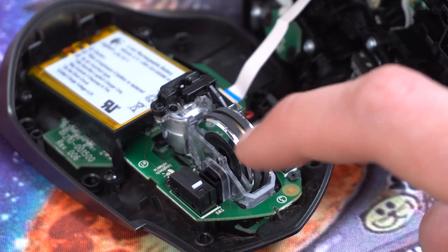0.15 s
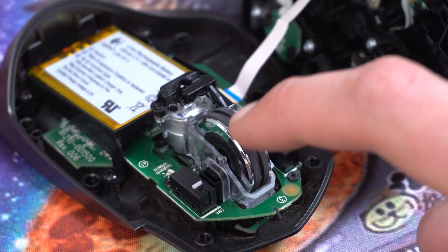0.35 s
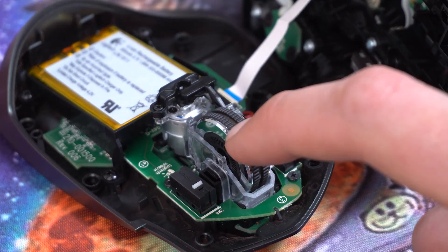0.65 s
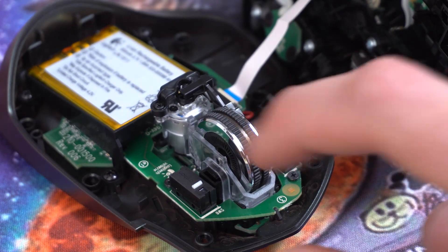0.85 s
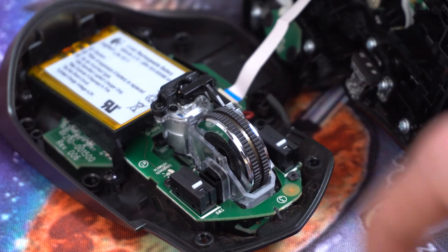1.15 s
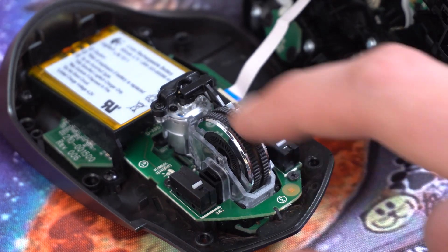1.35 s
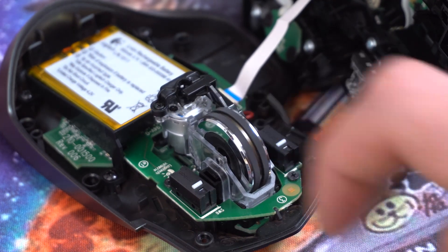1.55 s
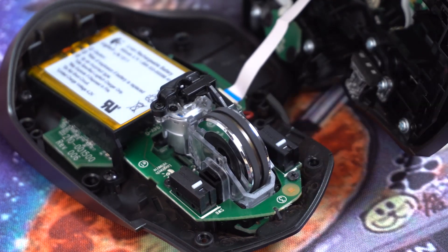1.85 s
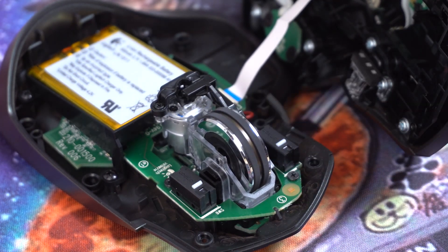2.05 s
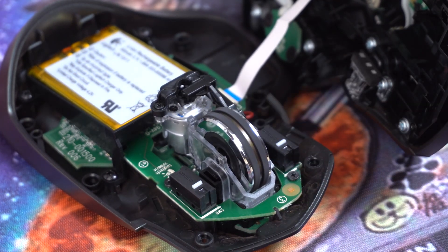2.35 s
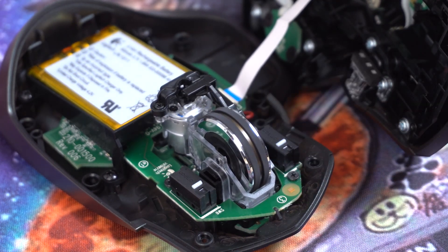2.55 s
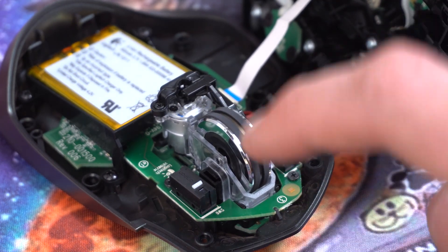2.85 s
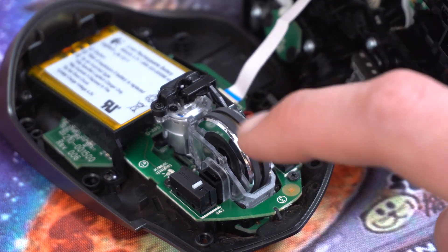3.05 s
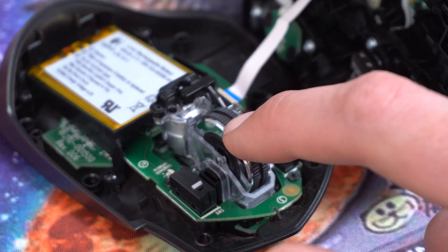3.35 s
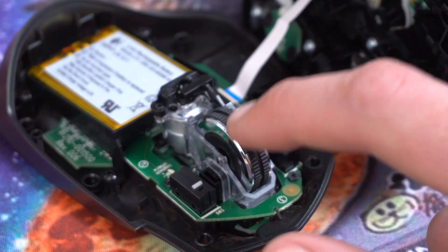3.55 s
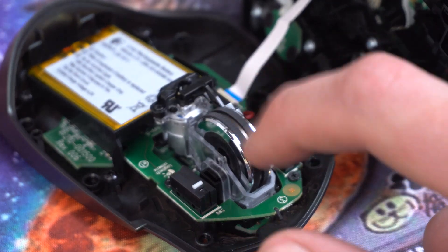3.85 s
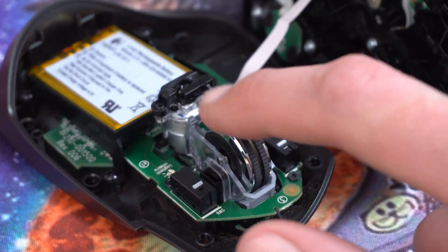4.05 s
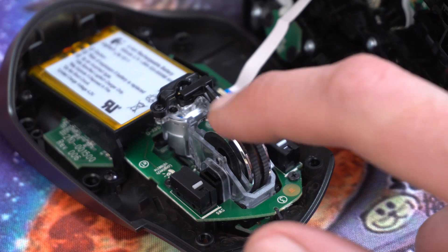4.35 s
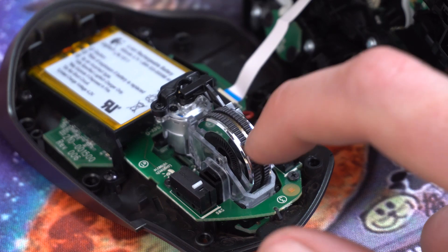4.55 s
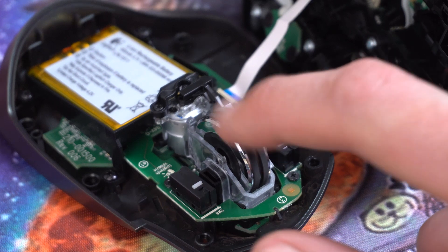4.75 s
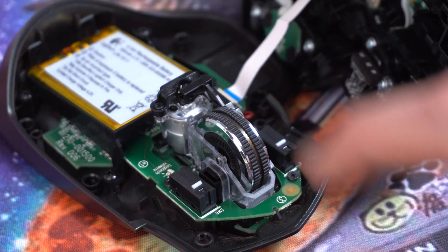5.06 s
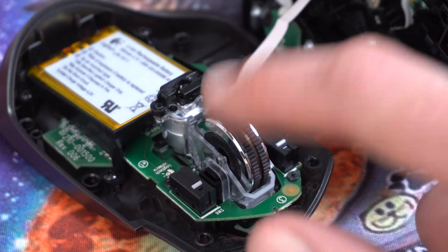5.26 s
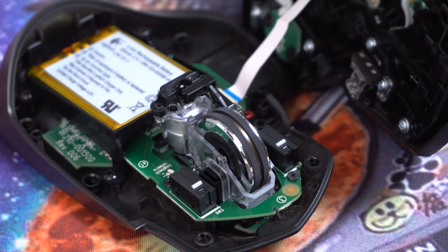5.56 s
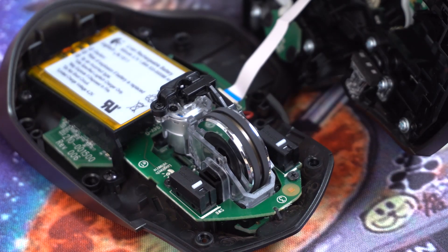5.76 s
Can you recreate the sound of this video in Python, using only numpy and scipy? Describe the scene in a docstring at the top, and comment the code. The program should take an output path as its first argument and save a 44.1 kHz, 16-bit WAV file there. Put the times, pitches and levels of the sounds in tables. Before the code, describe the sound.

Close, irregular ticking of a metal scroll wheel worked by a finger, with crisp latch snaps, dull knocks and a faint low hum.

```python
"""The metal scroll wheel of an opened mouse, worked by a finger on a desk mat, close and nearly mono.
Rolling or flicking drags a sprung pawl over the teeth; pressing snaps the latch; the shell rocks.
A few dull knocks come from further off in the small room, over mains hum and a fan."""
import sys
import numpy as np
from scipy import signal
from scipy.fft import rfft, irfft
from scipy.io import wavfile
from scipy.ndimage import uniform_filter1d

SR = 44100
rng = np.random.default_rng(int(sys.argv[2]) if len(sys.argv) > 2 else 0)


def log_audio(samples):
    """Write samples as a 16-bit WAV file to the path given in sys.argv[1]."""
    # one column per channel
    frames = np.atleast_2d(samples).T
    # limit to full scale, then quantise
    limited = np.clip(frames, -1, 1)
    pcm = np.round(limited * 32767).astype(np.int16)
    wavfile.write(sys.argv[1], SR, pcm)


N = 261072

# Table levels are relative; each source adds its own gain.
# finger rolls: (time [s], teeth, first gap [s], middle gap [s], last gap [s], level [dB],
# change over the roll [dB], treble [dB], shell push [dB])
ROLLS = [(3.8619, 5, 0.026, .017, 0.017, -25.5, 1.5, -12, -34),
         (4.184, 4, .0165, .0194, .0176, -25, -1, -9.5, -35),
         (4.483, 4, .0189, .019, .0198, -25.5, 0.5, -13, -34),
         (4.856, 6, .0139, 0.0093, .019, -22, -2, -13, -31.5)]
# slips on release: (time [s], first gap [s], level [dB], treble [dB], shell push [dB])
SLIPS = [(0.9153, 0.016, -30, -9.5, -39), (3.9795, .0146, -32, -9, -37), (4.264, 0.015, -27.5, -12, -38.5),
         (4.5821, .0138, -31.5, -12.5, -39.5), (4.9643, 0.017, -28, -14.5, -34.5)]
# flicks: (time [s], start speed [teeth/s], peak [dB], slope past peak [dB/tooth], shell push [dB])
FLICKS = [(1.574, 88.6, -12.5, -7, -31.5), (5.3819, 101, -12, -5.5, -29)]
# dense, fast-dying modes of wheel and cradle: (frequency [Hz], level [dB])
WHEEL_CRACK = [(300, -8), (1000, -11), (1500, 1.5), (2800, 4), (4600, -2), (6500, -2), (8300, -5),
               (9400, -4.5), (11500, -9), (16000, -8.5)]


def undb(db):
    """Decibels to gain."""
    return 10 ** (np.asarray(db) / 20)


def unit(x):
    """Scale to unit energy."""
    return x / np.sqrt(np.sum(x ** 2))


def colour(x, points):
    """Filter by (frequency [Hz], gain [dB]) points."""
    hz, db = np.transpose(points)
    bins_hz = np.maximum(np.fft.rfftfreq(len(x), 1 / SR), 1)
    return irfft(rfft(x) * undb(np.interp(np.log(bins_hz), np.log(hz), db)), len(x))


def noise(points):
    """Coloured noise, unit rms."""
    x = colour(rng.standard_normal(N), points)
    return x / x.std()


def walk(rate_hz):
    """Smooth random wander, spread near one."""
    hold = int(SR / rate_hz)
    return uniform_filter1d(np.repeat(rng.standard_normal(N // hold + 1), hold), hold)[:N]


def highpass(x, hz):
    """Fourth-order high-pass."""
    return signal.sosfilt(signal.butter(4, hz, "high", fs=SR, output="sos"), x)


def add(track, s, sound):
    """Mix a sound in at time s."""
    start = max(int(s * SR), 0)
    track[start:start + len(sound)] += sound[:max(N - start, 0)]


def ring(modes, t, scatter_db, detune):
    """Decaying modes; pitch, polarity and energy share scatter per blow."""
    hz, db, t60_s = np.transpose(modes)[:, :, None]
    shift, share, polarity = rng.standard_normal((3, len(modes), 1))
    amplitude = np.sign(polarity) * undb(db + scatter_db * share) / np.sqrt(t60_s)
    tones = np.sin(2 * np.pi * hz * (1 + detune * shift) * t)
    return unit(np.sum(amplitude * tones * np.exp(-np.log(1000) * t / t60_s), axis=0))


def strikes(events, modes, crack_spectrum, treble_ref_db, scrape_db, scrape_s, chatter_s,
            crack_db, crack_s, detune, low_hz):
    """Scrape, blow and chatter ring the modes, plus a dense-mode crack. Returns (direct, room send)."""
    direct, send, lead = np.zeros(N), np.zeros(N), SR // 100
    t = np.arange(SR // 10) / SR
    scrape = undb(scrape_db) * np.exp(-t[lead:0:-1] / scrape_s)
    force_envelope = np.concatenate([scrape, np.exp(-t[:-lead] / chatter_s)])
    crack_envelope = np.concatenate([scrape, np.exp(-t[:-lead] / crack_s)])
    for s, db, treble_db in events:
        force = force_envelope * rng.standard_normal(len(t))
        force[lead] += 3.5  # the blow
        body = unit(signal.fftconvolve(force, ring(modes, t, scatter_db=0, detune=detune))[:len(t)])
        body = highpass(body, low_hz)  # small parts radiate little bass
        crack = unit(crack_envelope * colour(rng.standard_normal(len(t)), crack_spectrum))
        # the room hears all sides, where dense modes weigh more
        for track, dense_db in (direct, crack_db), (send, crack_db + 12.5):
            click = colour(body + undb(dense_db) * crack, [(3500, 0), (6000, treble_db - treble_ref_db)])
            add(track, s + .0007 - lead / SR, undb(db) * unit(click))
    return np.array([direct, send])


def air(swell_db):
    """Ventilation rush and hiss over building rumble."""
    # room air and microphone hiss: (frequency [Hz], density [dB])
    spectrum = [(53, -36), (90, -8), (187, -4), (213, -8.5), (276, -4.5), (307, -9), (365, -9.5),
                (389, -17.5), (453, -9.5), (586, -16), (1270, -21.5), (1360, -23.5), (3010, -22.5),
                (4840, -30), (15500, -33)]
    rush = undb(-55.16 + 0.5 * walk(3.17)) * noise(spectrum)
    rumble_gain = undb(-57 + swell_db + 0.5 * walk(4.9))
    return rush + rumble_gain * noise([(15, -38), (28, -8), (40, 0), (80, -4), (130, -14), (400, -81)])


def hum(swell_db):
    """Swelling mains hum under wavering fan tones."""
    # mains, then fan: (frequency [Hz], level [dB])
    tones = [(59.2, -53.5), (279.9, -61), (452.2, -71.5)]
    (mains_hz, mains_db), *fan = tones
    t = np.arange(N) / SR
    out = undb(mains_db + swell_db + 0.5 * walk(3.16)) * np.sin(2 * np.pi * mains_hz * t)
    for hz, db in fan:
        out += undb(db - 3 + 4.5 * walk(11)) * np.sin(2 * np.pi * hz * t + 0.82 * walk(12))
    return np.sqrt(2) * out


def room(x, wet_db, build_s, echo_db, echo_s):
    """One near reflection and a diffuse tail that builds up, then decays per band."""
    # tail bands: (frequency [Hz], level [dB], t60 [s])
    bands = [(100, -7, 0.13), (507, 19, 0.2), (1390, 3, 0.38), (2900, 2.5, 0.63), (6940, 4, 0.45),
             (11200, 0.5, 0.47), (16000, -8, 0.41)]
    hz, db, t60_s = np.transpose(bands)
    t = np.arange(SR * 3 // 4) / SR
    bins_hz = np.maximum(np.fft.rfftfreq(len(t), 1 / SR), 1)
    wash, tail = rfft(rng.standard_normal(len(t))), 0
    for band, gain, decay_s in zip(np.eye(len(hz)), undb(db), t60_s):
        band_noise = irfft(wash * np.interp(np.log(bins_hz), np.log(hz), band), len(t))
        tail += gain * band_noise * np.exp(-np.log(1000) * t / decay_s)
    response = undb(wet_db) * unit(tail * (1 - np.exp(-t / build_s)))
    response[int(echo_s * SR)] += undb(echo_db)
    return signal.fftconvolve(x, response)[:N]


def knocks():
    """Dull knocks on furniture: a boxy ring and a short clatter."""
    # knocks: (time [s], level [dB], bass [dB], boxiness [dB], treble [dB])
    hits = [(2.162, -24, -6.5, -18, -17.5), (2.173, -30, -11.5, -27, -19.5), (4.985, -40, -27, -10, -28),
            (5.886, -25, -16, -9.5, -13)]
    # furniture modes: (frequency [Hz], level [dB], t60 [s])
    modes = [(110, 0, 0.12), (160, -8, 0.084), (248, 6.5, 0.032), (313, 7, 0.027), (431, -3, 0.046),
             (800, -3.5, 0.015), (1140, -4.5, 0.016), (1490, -2.5, 0.036)]
    # dense modes: (frequency [Hz], level [dB])
    clatter_spectrum = [(60, -5), (200, 10), (900, -9.5), (3500, -2), (7000, -12), (15000, -30)]
    track, t = np.zeros(N), np.arange(SR // 5) / SR
    for s, db, bass_db, box_db, treble_db in hits:
        clatter = unit(colour(rng.standard_normal(len(t)), clatter_spectrum) * np.exp(-t / 0.009))
        knock = ring(modes, t, scatter_db=2, detune=0.024) + undb(-2.5) * clatter
        eq = [(180, bass_db + 9.5), (400, box_db + 7.5), (800, .076), (1500, 1), (3500, treble_db + 13.5)]
        add(track, s - 1 / 20, undb(db + 15.5) * unit(colour(np.pad(knock, SR // 20), eq)))
    return track


def thumps():
    """Low thumps: finger pushes, the latch's thud, and the bass of the distant knock at 2.176 s."""
    # single thumps: (time [s], level [dB])
    singles = [(.762, -34), (1.041, -39), (2.176, -37), (2.923, -31.5), (2.939, -32.5), (2.988, -35),
               (3.44, -41)]
    # (moves, delay [s], gain [dB]); last: the drop back after a flick
    moves = (ROLLS, .0252, 0), (SLIPS, .036, 0), (FLICKS, -.00944, 0), (FLICKS, .06, -3)
    return singles + [(s + lag_s, db + gain_db) for rows, lag_s, gain_db in moves for s, *_, db in rows]


def shell():
    """Low thumps ring the modes of the shell on its mat; each tooth jogs it."""
    # shell on mat: (frequency [Hz], level [dB], t60 [s])
    modes = [(40.8, 4, 0.45), (60, 0.5, 0.082), (104.9, -3, 0.33), (166.7, -8.5, 0.18), (236, -16, 0.031),
             (320, -10.5, 0.037)]
    track, t = np.zeros(N), np.arange(SR // 4) / SR
    for s, db in thumps():
        thump = ring(modes, t, scatter_db=0, detune=0.056) * (1 - np.exp(-t / 0.0012))
        add(track, s, undb(db + 24) * unit(thump))
    for s, db, _ in tooth_drops():
        jog = highpass(ring(modes, t, scatter_db=-2.5, detune=0.017), 87)
        add(track, s, undb(db) * unit(jog))
    return track


def cradle():
    """The wheel's cradle pings as the landing finger takes up its slack."""
    # touches: (time [s], level [dB], treble [dB])
    touches = [(0.6968, -30.5, -14), (1.5692, -30, -5), (3.3847, -25.5, -7), (4.4368, -37.5, -5),
               (4.851, -26.5, -13), (5.3765, -22.5, -6)]
    # cradle modes: (frequency [Hz], level [dB], t60 [s])
    modes = [(3045, 5, 0.032), (3600, -0.5, 0.04), (5760, -12, 0.012)]
    return undb(7) * strikes(
        touches, modes, WHEEL_CRACK, treble_ref_db=-10, scrape_db=-22, scrape_s=.001,
        chatter_s=.0017, crack_db=-21, crack_s=.0017, detune=.0037, low_hz=1000)


def latch():
    """The sprung latch snaps against its plastic carrier, rebounds, then releases."""
    # snaps: (time [s], level [dB], treble [dB], low cut [Hz])
    snaps = [(0.7603, -13, -6, 1910), (3.4875, -7.5, -9.5, 1050)]
    # spring rebounds and release: (delay [s], level [dB], treble [dB])
    rebounds = [(.004, -16.5, -11), (.011, -17.5, -11), (.016, -18.5, -12), (.0838, -22.5, -15)]
    # latch modes: (frequency [Hz], level [dB], t60 [s])
    modes = [(1536, 1.5, 0.0081), (1980, -6, 0.009), (2454, 7.5, 0.022), (2590, 5.5, .022),
             (2920, 5, 0.006), (3170, 3, 0.011), (3720, -6, 0.016), (5000, -9, 0.035), (5670, -6.5, 0.054),
             (6360, -4.5, 0.012), (6680, -11, 0.018), (7770, -11, 0.028), (8440, -0.5, 0.005),
             (8780, -4, 0.014), (11160, -3.5, 0.005), (12700, -21, 0.0072)]
    # dense modes: (frequency [Hz], level [dB])
    crack = [(300, -7), (1000, -11), (1550, 4.5), (2800, 16.5), (4200, 6), (9000, 0.5), (12000, 0),
             (13000, -10), (16000, -11)]
    out = 0
    for s, db, treble_db, low_hz in snaps:
        out += strikes([(s, db, treble_db)], modes, crack, treble_ref_db=-15, scrape_db=-16,
                       scrape_s=.0032, chatter_s=.00097, crack_db=-5, crack_s=.0017,
                       detune=.008, low_hz=low_hz)
        bounces = [(s + delay_s, *strength) for delay_s, *strength in rebounds]
        out += strikes(bounces, modes, crack, treble_ref_db=-16, scrape_db=-13, scrape_s=.0027,
                       chatter_s=.0025, crack_db=-6.5, crack_s=.0028, detune=.015, low_hz=1400)
    return undb(12) * out


def spin(delay_s=.024):
    """Flicked free of the pawl, the metal wheel rings on."""
    # free wheel: (frequency [Hz], level [dB], t60 [s])
    modes = [(2690, -5, .22), (5870, -7, .12), (6050, -2, 0.2), (6266, -1, .3), (9900, -14, .22)]
    track, t = np.zeros(N), np.arange(SR // 3) / SR
    for s, _, peak_db, *_ in FLICKS:
        add(track, s + delay_s, undb(peak_db - 4) * ring(modes, t, scatter_db=3, detune=0.0019))
    return track


def rolled():
    """Under the finger, teeth pass at a smoothly changing pace."""
    for s, teeth, first_s, middle_s, last_s, db, fade_db, treble_db, _ in ROLLS:
        gaps_s = np.interp(np.linspace(0, 2, round(teeth) - 1), np.arange(3), [first_s, middle_s, last_s])
        for delay_s in np.cumsum(np.append(0, gaps_s)):
            yield s + delay_s, db + fade_db * delay_s / gaps_s.sum(), treble_db


def slipped(teeth=3, gap_ratio=0.89, fade_db=-2.5, dull_db=-1.5):
    """Let go, the wheel slips on, each tooth sooner, softer and duller."""
    for s, gap_s, db, treble_db, _ in SLIPS:
        for k in range(teeth):
            yield s, db + k * fade_db, treble_db + k * dull_db
            s += gap_s * gap_ratio ** k


def flicked(teeth=6, accel_per_s2=5000, peak_tooth=3.08, rise_db=3, treble_db_per_db=1.63):
    """The wheel accelerates evenly; teeth swell and brighten, then fade; the pawl is thrown clear."""
    for s, teeth_per_s, peak_db, fade_db, _ in FLICKS:
        for k in range(teeth):
            delay_s = (np.sqrt(teeth_per_s ** 2 + 2 * accel_per_s2 * k) - teeth_per_s) / accel_per_s2
            force_db = (k - peak_tooth) * (rise_db if k < peak_tooth else fade_db)
            yield s + delay_s, peak_db + force_db, -3 + treble_db_per_db * force_db
        yield s + .043, peak_db - 8.5, -14  # the pawl's dull clack


def tooth_drops():
    """All pawl drops: (time [s], level [dB], treble [dB])."""
    # single-tooth nudges: (time [s], level [dB], treble [dB])
    nudges = [(0.9753, -39.5, -19), (1.0125, -40, -25), (3.609, -33.5, -7), (3.8744, -44, -8),
              (4.8334, -45, -1), (5.3656, -37, -4)]
    return np.array([*rolled(), *slipped(), *flicked(), *nudges])


def ratchet():
    """The pawl ticks over each tooth tip, then falls into the gap and rings the wheel."""
    # wheel modes: (frequency [Hz], level [dB], t60 [s])
    modes = [(1574, -1, 0.019), (2130, -10, 0.027), (2500, 1.5, 0.026), (2667, 0, 0.054),
             (2980, -1.5, 0.024), (3670, -7, 0.086), (5560, -5, 0.026), (6160, 0.5, 0.0099),
             (6525, 2.5, 0.018), (6650, -5.5, 0.0055), (7960, -5, 0.017), (8670, -11, 0.0098),
             (10000, -14.5, 0.014), (10900, -3, 0.0041), (12500, -8, 0.0035), (13800, -13, 0.005)]
    drops = tooth_drops()
    tips = drops + (-.005, -13, 8)  # earlier, softer, brighter
    tick = strikes(tips, modes, WHEEL_CRACK, treble_ref_db=-9.5, scrape_db=-13, scrape_s=.0011,
                   chatter_s=.0021, crack_db=-9, crack_s=.0034, detune=.012, low_hz=2400)
    fall = strikes(drops, modes, WHEEL_CRACK, treble_ref_db=-10, scrape_db=-18.5, scrape_s=.0018,
                   chatter_s=.0009, crack_db=-7.5, crack_s=.0044, detune=.012, low_hz=1250)
    return undb(9.5) * (tick + fall)


def scene():
    """Mouse close and fairly dry, knocks far and wet; only faint noise differs between channels."""
    # swell of hum and rumble: (time [s], level [dB])
    swell = [(0.0, -59.5), (1.0, -51), (1.61, -52), (1.99, -58.5), (3.04, -51), (3.47, -49.5), (3.68, -57),
             (4.9, -49.5), (5.9, -56.5)]
    swell_db = np.interp(np.arange(N) / SR, *np.transpose(swell))
    swell_db -= swell_db.mean()
    mouse, send = ratchet() + spin() + latch() + cradle()
    near = mouse + room(send, wet_db=-13, build_s=0.0022, echo_db=-11, echo_s=0.0099)
    knock = knocks()
    far = knock + room(knock, wet_db=-3.5, build_s=0.037, echo_db=-21, echo_s=0.0044)
    mid = near + far + shell() + hum(swell_db) + air(swell_db)
    side = undb(-66) * noise([(25, 27), (70, 9.5), (200, -1.5), (600, 6), (1200, 4), (2500, -4),
                              (5000, 4), (15000, 5)])
    return np.array([mid + side, mid - side])


def record(dry):
    """Cut the deepest bass and the top."""
    low_hz, top_hz = 28.6, 15950
    return signal.sosfilt(signal.ellip(10, .2, 80, top_hz, fs=SR, output="sos"), highpass(dry, low_hz))


dry = scene()
out = record(dry)
log_audio(out)
```